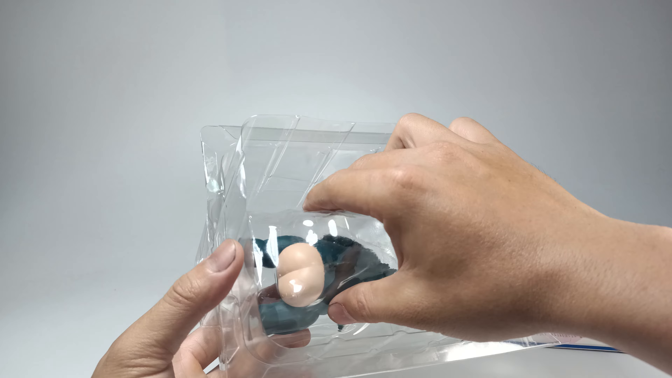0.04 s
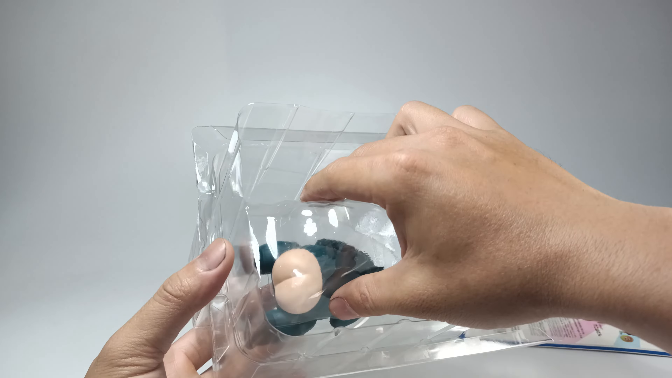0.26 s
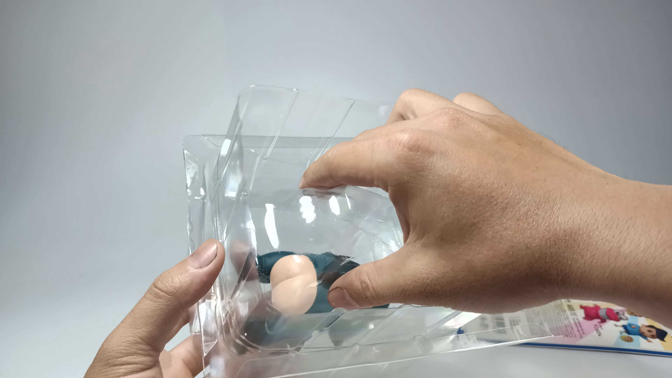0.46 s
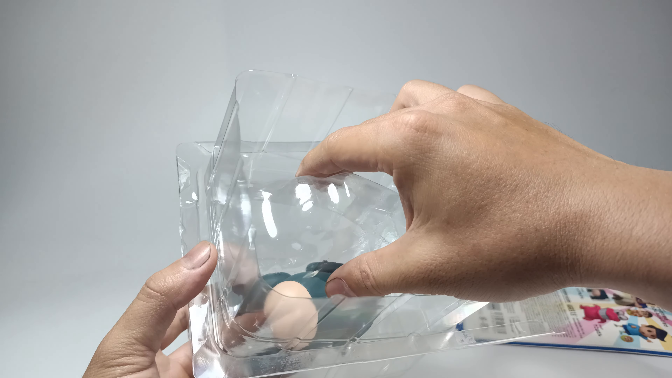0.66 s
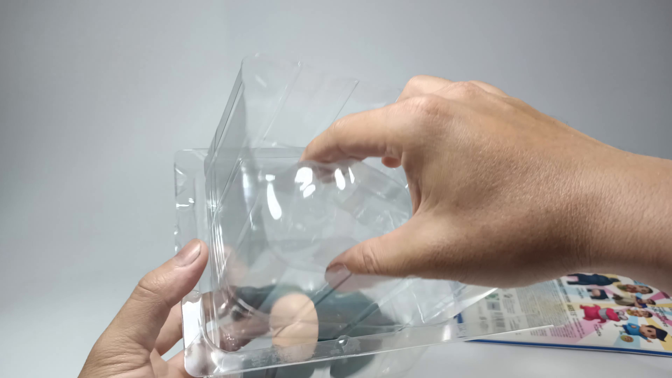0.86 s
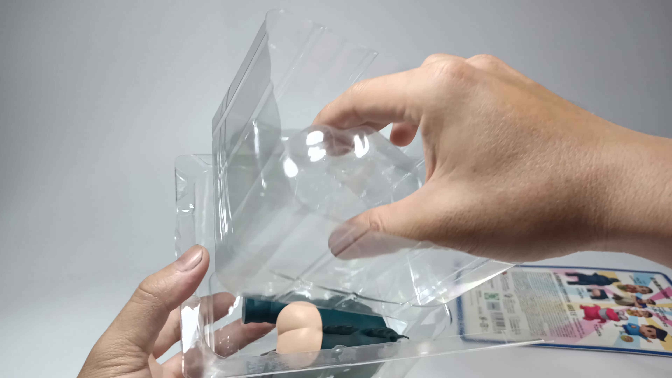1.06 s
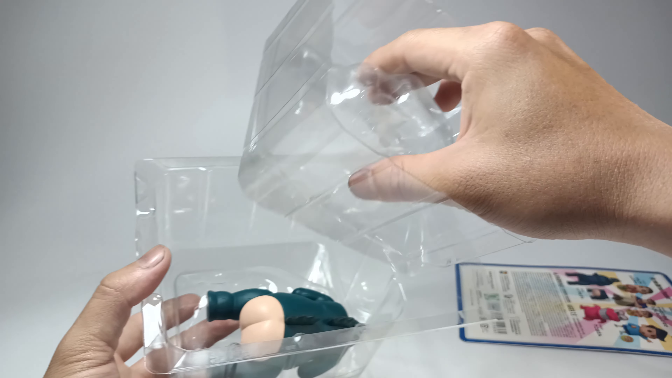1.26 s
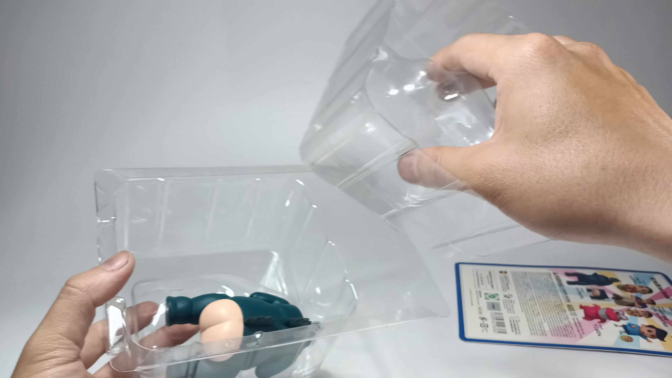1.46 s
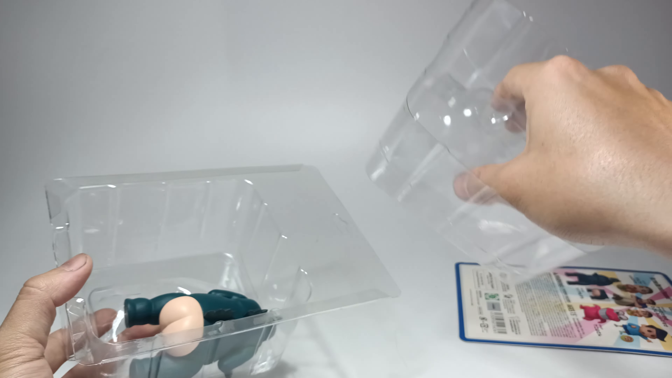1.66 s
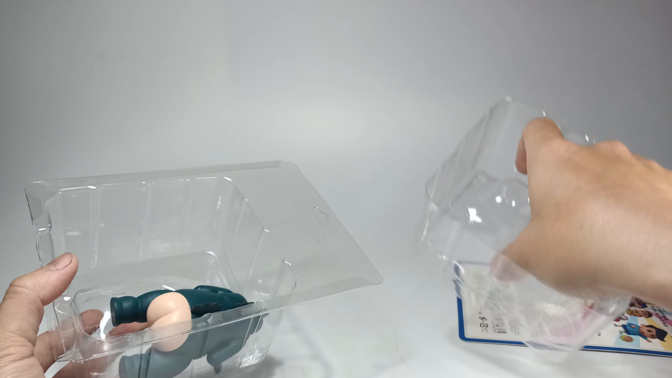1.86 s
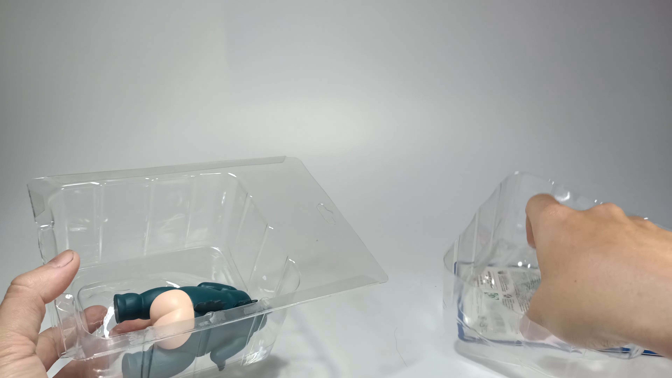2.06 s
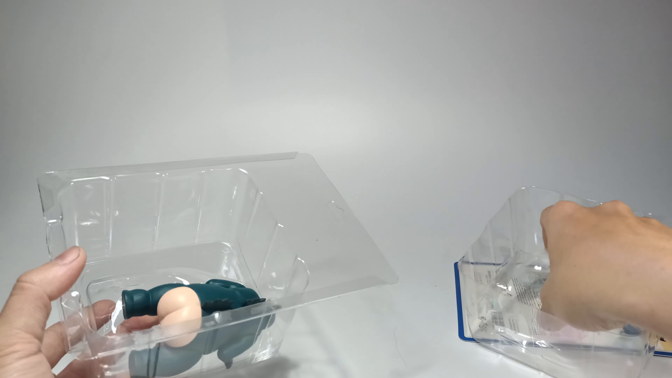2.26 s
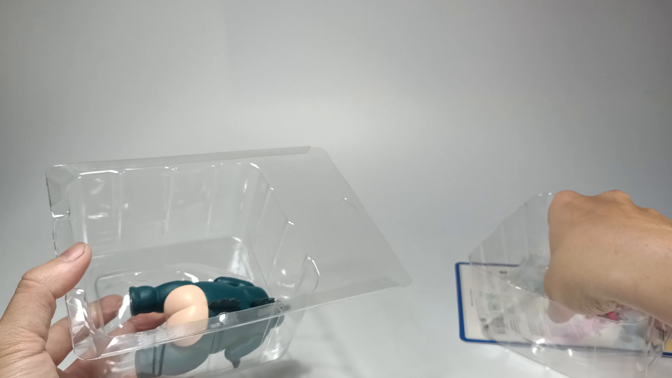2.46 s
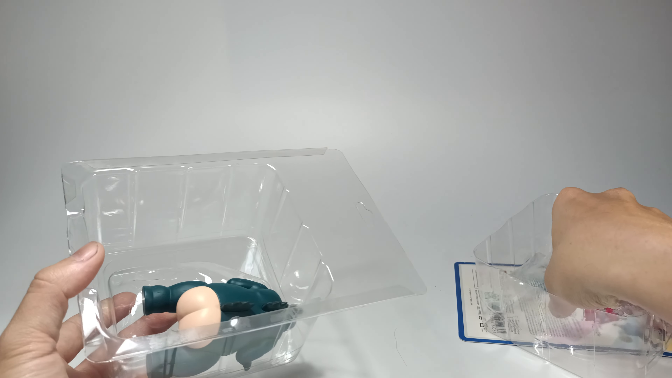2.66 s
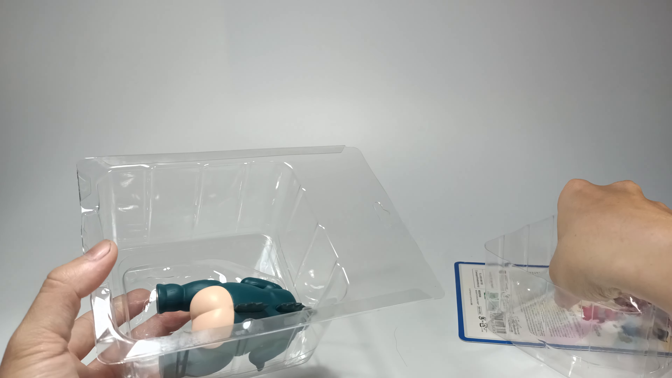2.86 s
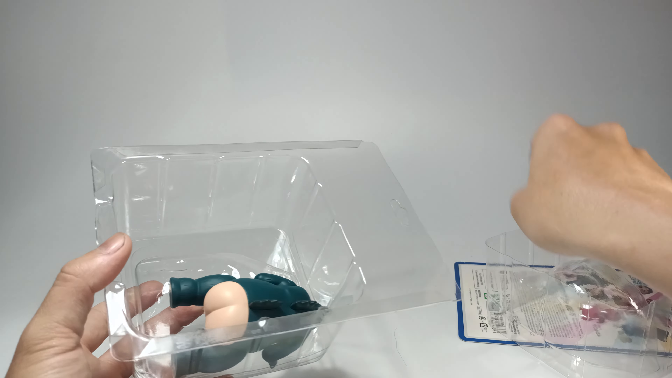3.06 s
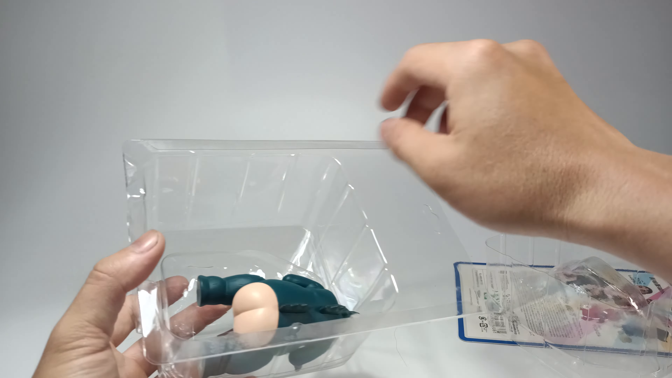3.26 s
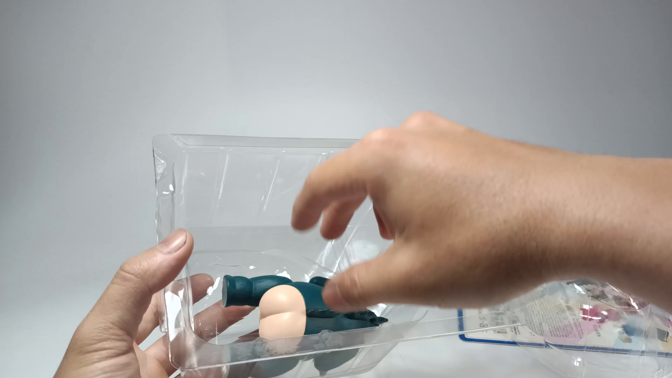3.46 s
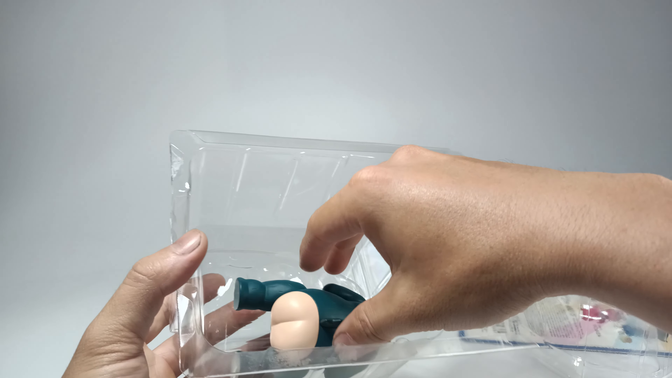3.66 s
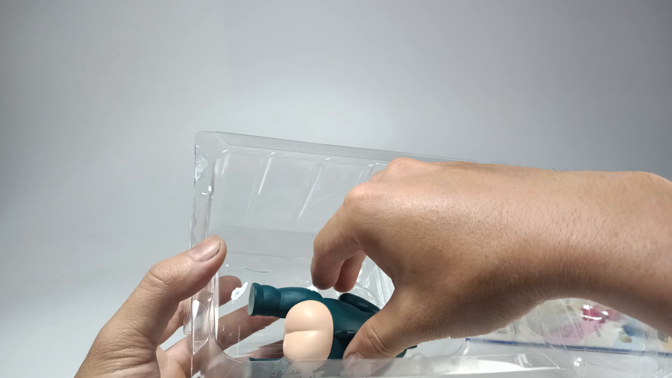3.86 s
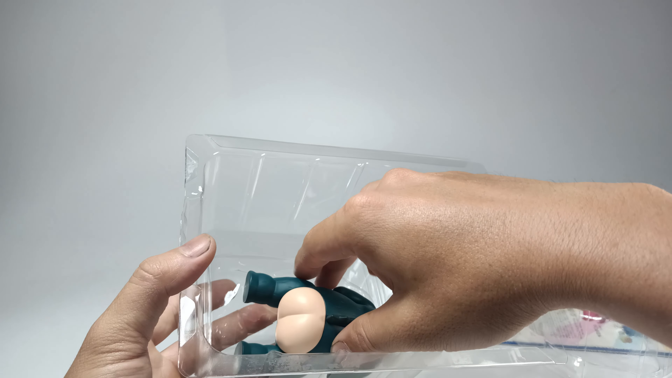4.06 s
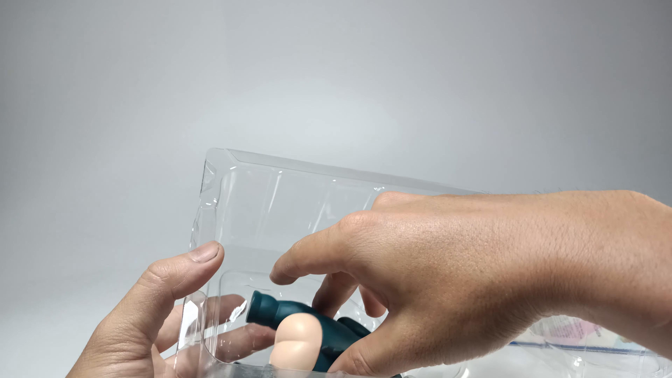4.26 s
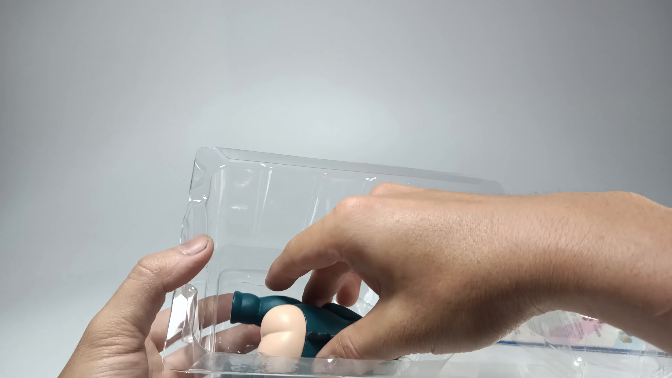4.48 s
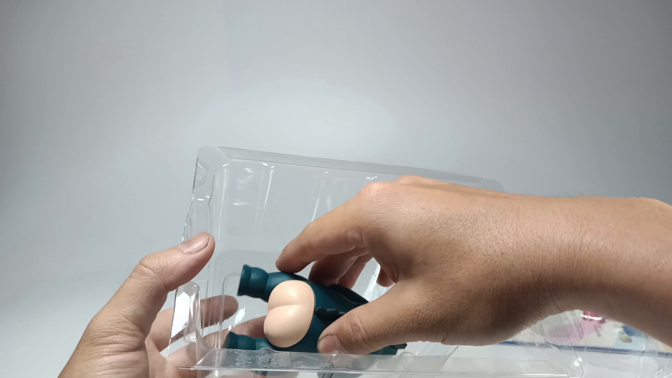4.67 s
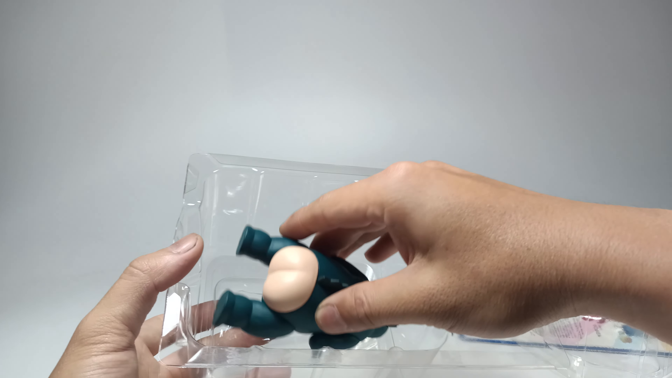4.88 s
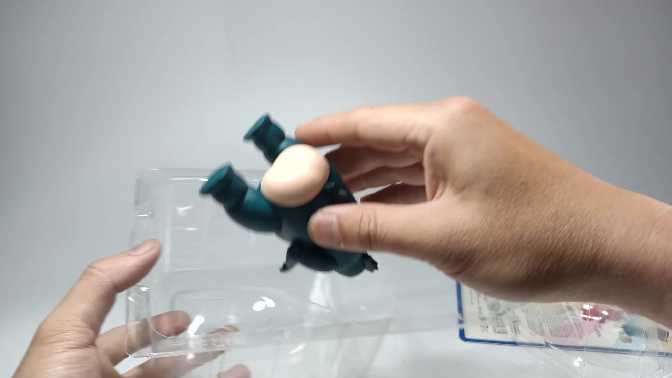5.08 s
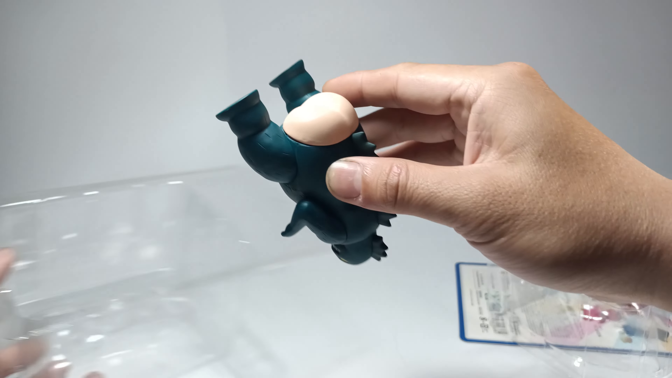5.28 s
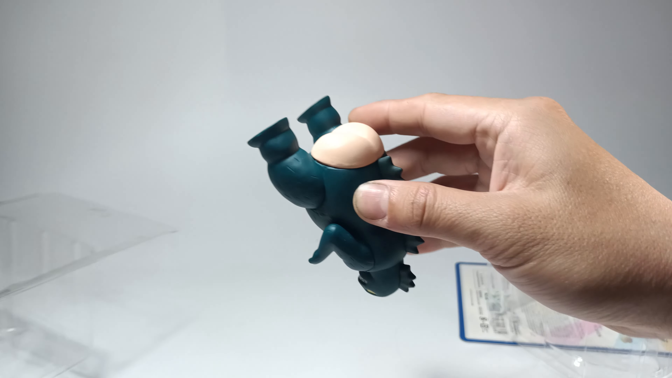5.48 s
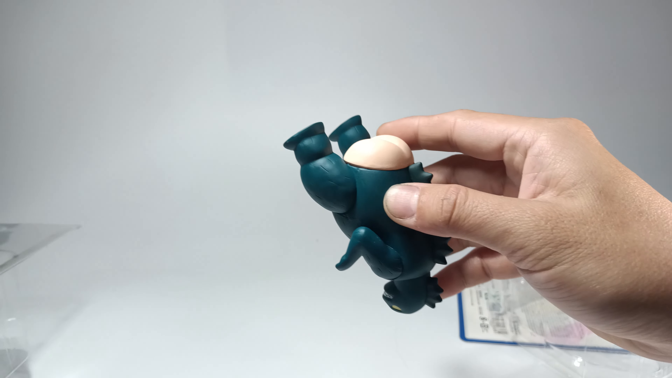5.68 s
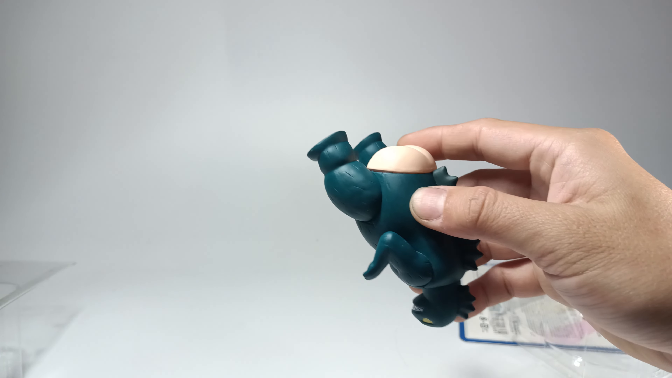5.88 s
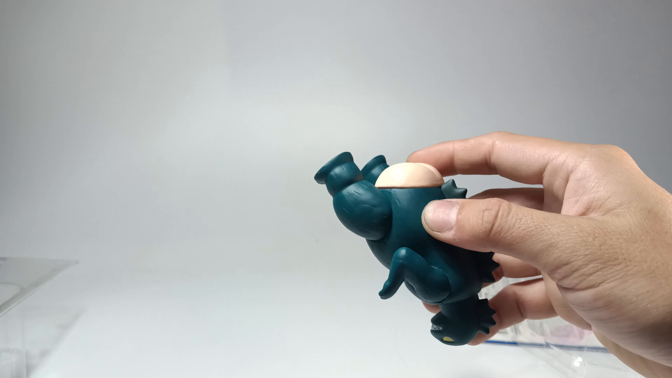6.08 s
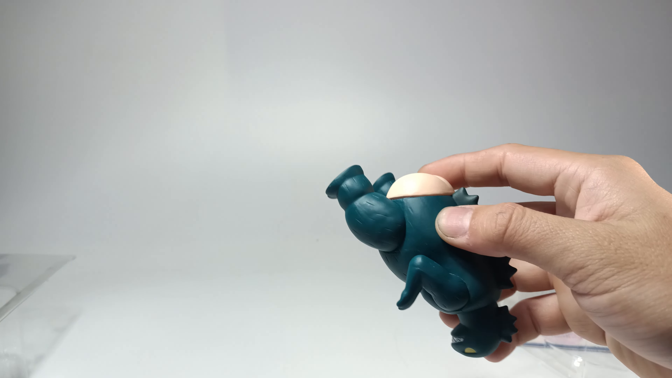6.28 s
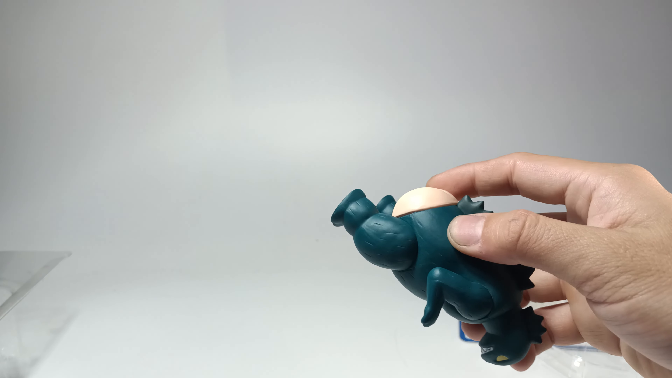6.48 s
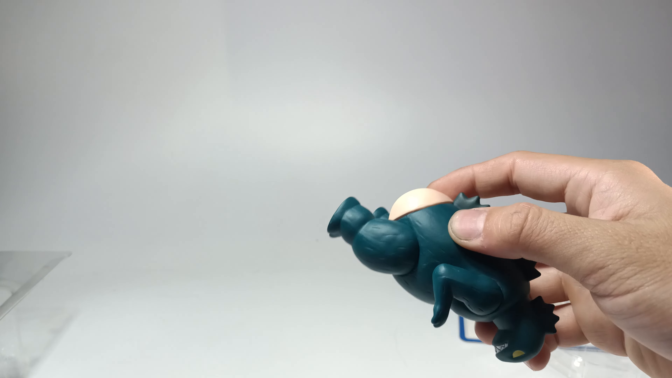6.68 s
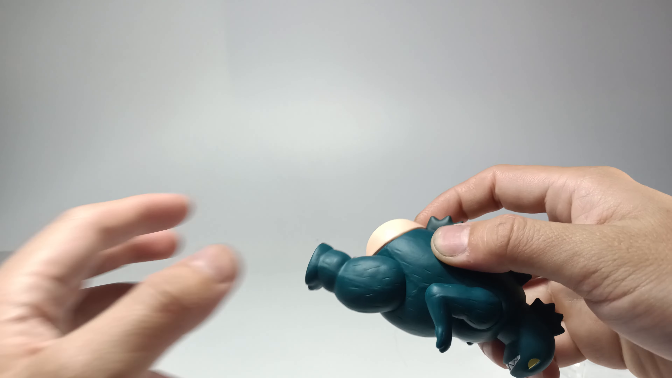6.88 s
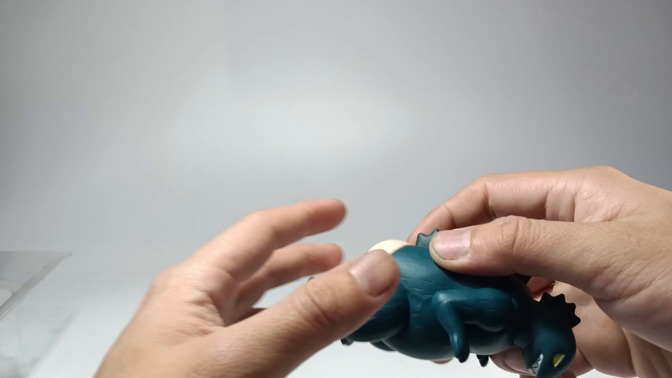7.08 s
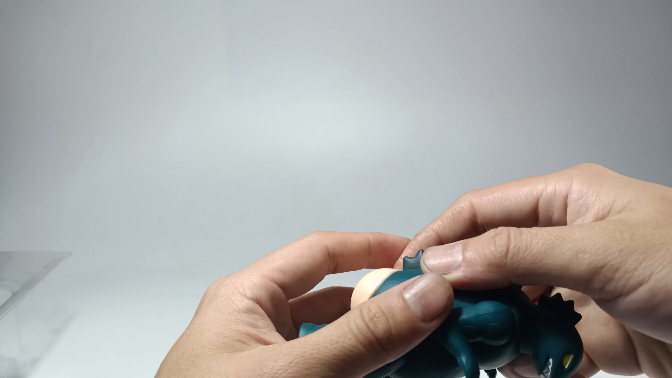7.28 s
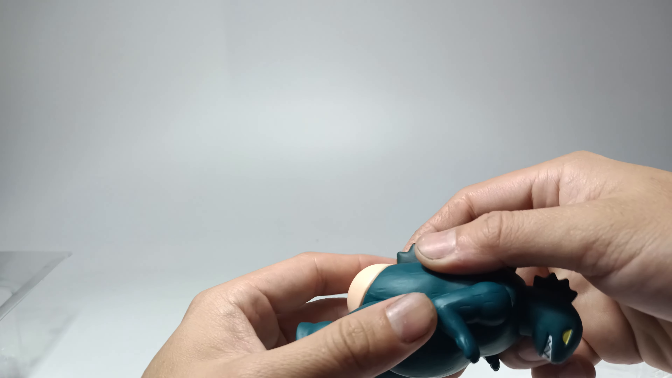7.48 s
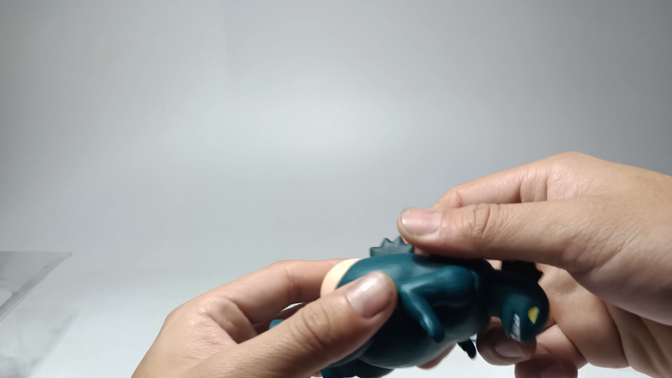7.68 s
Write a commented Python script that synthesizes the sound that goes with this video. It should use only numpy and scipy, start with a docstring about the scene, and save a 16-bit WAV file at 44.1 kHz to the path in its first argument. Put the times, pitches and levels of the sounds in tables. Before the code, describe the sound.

Hands open a thin clear plastic tray very close to the microphone. Sharp snaps build to two loud bursts of crackling with brief squeaks and hollow booms as the lid comes free. The lid lightly taps and drags on card, then fingers crinkle the tray, a crisp pop releases the toy, and the empty tray drops with a short clatter. Small quiet room with low rumble and faint hum.

```python
"""Opening a plastic blister tray

Hands pull the lid off a thin plastic tray, lay it on its card, prise a toy out and drop the tray aside.
Snaps, taps and landings are noise bursts and sums of decaying modes; squeaks are wavering tones.
Sliding is a dense train of random slips that hisses and stirs the walls; nails tick on the plastic.
A small room with rumble and a low mains hum is heard through two close microphone ports."""
import sys
import numpy as np
from scipy import signal
from scipy.fft import rfft, irfft, next_fast_len
from scipy.io import wavfile
from scipy.ndimage import uniform_filter1d, map_coordinates

SR = 44100
rng = np.random.default_rng(int(sys.argv[2]) if len(sys.argv) > 2 else 0)


def wav_record(signal):
    """Record a signal, one row per channel, as 16-bit PCM in the file named by sys.argv[1]."""
    frames = np.transpose(np.atleast_2d(signal))
    bounded = np.clip(frames, -1, 1)
    # unit amplitude maps onto the largest positive 16-bit level
    quanta = np.round(bounded * 32767).astype(np.int16)
    wavfile.write(sys.argv[1], SR, quanta)


N = 340893
TOP_HZ = 16200  # little is heard above this

# ringing modes of the lid's walls: f/Hz, level/dB, T60 as a multiple of the snap's own [1]
LID_WALL_MODES = [(804.6, 5.5, 1.7), (910, 6, 0.52), (1123, -2, 0.79), (1240, -5, 0.51), (1290, -0.5, 1.1),
                  (1413, -5, 2.4), (1568, 0, 1.9), (1700, -12.5, 1.4), (1892, -4.5, 1.2), (1970, -6.5, 1.5),
                  (2230, -4.5, 1.4), (2370, -6.5, 1.1), (3380, -2, 1.4)]
# spectrum of the lid's crowded, heavily damped modes: f/Hz, level per Hz/dB
LID_CLATTER_SPECTRUM = [(350, -10.5), (650, -5), (900, -1.5), (1600, -2.5), (2300, -7.5), (3200, -20),
                        (6000, -39)]
# spectrum of the bending panels: f/Hz, level per Hz/dB
PANEL_SPECTRUM = [(50, -26), (85, -22), (120, 3.5), (160, 3.5), (220, 1.5), (320, 2), (480, -2), (690, -13),
                  (1400, -40.5)]
# spectrum of a cracking crease: f/Hz, level per Hz/dB
CRACK_SPECTRUM = [(1500, -10), (2500, 6), (4500, 1), (7000, -1), (10000, -1.5), (12500, -4), (15500, -7.5)]
# strokes of plastic sliding over plastic, card and table:
# t/s, length/s, wall level/dB, hiss level/dB, run-out T60/s
SLIDING_STROKES = [(0.005, 0.072, -60.5, -67.5, 0.26), (0.184, 0.22, -68.5, -77.5, 0.44),
                   (0.293, 0.077, -57.5, -68.5, 1.3), (0.561, 0.12, -56, -84, 0.38),
                   (0.665, 0.044, -44.5, -56.5, 0.34), (0.97, 0.085, -51, -54, 0.31),
                   (1.08, 0.093, -71, -79, 1), (2.189, 0.22, -69.5, -87, 0.49),
                   (2.435, 0.11, -76, -88, 1.7), (2.954, 0.074, -68.5, -64.5, 0.12),
                   (3.815, 0.065, -71.5, -84, 0.84), (4.066, 0.09, -69.5, -83, 0.21),
                   (4.344, 0.12, -66, -72, 0.23), (4.48, 0.21, -68, -82, 3),
                   (5.147, 0.15, -69.5, -73, 0.37), (5.357, 0.24, -68, -77, 0.4),
                   (5.625, 0.058, -69.5, -70.5, 1.05), (5.886, 0.072, -55.5, -51.5, 0.37),
                   (6.103, 0.041, -70, -71, 0.37), (6.474, 0.074, -80, -75.5, 0.18),
                   (6.521, 0.11, -72, -70, 0.18)]
STROKE_ATTACK_S = 0.03


def undb(db):
    """Level to amplitude: 20 dB is a factor of ten."""
    return 10 ** (np.asarray(db) / 20)


def unit(x):
    """Normalisation to an rms of 1."""
    return x / np.sqrt(np.mean(x ** 2))


def curve(rows, column=1):
    """Linear interpolation in time of one column of a table."""
    rows = np.array(rows)
    return np.interp(np.arange(N) / SR, rows[:, 0], rows[:, column])


def colour(x, points):
    """Zero-phase filtering through (f/Hz, gain/dB) points joined on a log-frequency axis."""
    hz, db = np.transpose(points)
    size = next_fast_len(x.shape[-1], True)
    bins_hz = np.maximum(np.arange(size // 2 + 1) * SR / size, 1)
    gain = undb(np.interp(np.log(bins_hz), np.log(hz), db))
    return irfft(rfft(x, size) * gain, size)[..., :x.shape[-1]]


def noise(points, n, apart):
    """Partly coherent coloured noise at two ports; apart is the share of power that differs."""
    shared, *own = colour(rng.standard_normal((3, n)), points)
    apart = np.clip(apart, 0, 1)
    return unit(np.sqrt(1 - apart) * shared + np.sqrt(apart) * np.array(own))


def walk(rate):
    """Smoothed random steps, rate per second, with an rms near 1."""
    step = max(int(SR / rate), 1)
    held = np.repeat(rng.standard_normal(N // step + 1), step)
    return unit(uniform_filter1d(held, step)[:N])


def fade(t, t60):
    """Exponential free decay: the level falls 60 dB in t60 seconds."""
    return np.exp(-np.log(1000) * t / np.maximum(t60, 0.003))


def near(hz, centre_hz, octaves):
    """Selective excitation: the level falls off from a centre, by 6 dB at the given octaves."""
    return -6 * np.log2(1 + (np.log2(np.asarray(hz) / centre_hz) / octaves) ** 2)


def add(out, s, x):
    """Superposition: mix x in at time s."""
    i = max(int(s * SR), 0)
    out[:, i:i + x.shape[-1]] += x[..., :N - i]


def swell(s, length, db, attack_s, release_t60):
    """Envelope of one movement: a linear rise, a hold and an exponential decay."""
    t = np.arange(N) / SR - s
    rise = np.clip(t / attack_s, 0, 1)
    return undb(db) * rise * fade(np.clip(t - length, 0, 2), release_t60)


def ring(t, hz, db, t60, detune, scatter_db, skew):
    """Modal superposition: each blow finds the modes a little shifted, each port at its own phase."""
    shift, size, side = rng.standard_normal((3, len(hz), 1))
    gain = undb(db[:, None] + scatter_db * size) * rng.choice([-1, 1], (len(hz), 1))
    phase = 2 * np.pi * hz[:, None] * (1 + detune * shift) * t
    swing = gain / np.sqrt(np.sum(gain ** 2) / 2) * fade(t, t60[:, None])
    # long waves reach both ports alike
    lead = skew * side * np.clip(hz[:, None] / 1100, 0, 1)
    return np.array([np.sum(swing * np.sin(phase + port * lead), axis=0) for port in (1, -1)])


def background():
    """Ventilation noise, coherent between the ports in the bass, and steady hum tones that waver."""
    # rumble spectrum: f/Hz, level per Hz/dB
    air_spectrum = [(12, -46.5), (20, -15.5), (48, -3.5), (70, -10.5), (86, -12), (107, -0.5), (142, -13.5),
                    (172, -7.5), (328, -12), (388, -18.5), (434, -15), (642, -23.5), (1090, -26.5),
                    (2820, -44.5), (16000, -63.5)]
    # mains hum at 50 and 100 Hz and a steady tone at 316 Hz: f/Hz, level/dB
    hum_tones = [(50, -80), (100, -64.5), (316, -77.5)]
    air_db, wander_db, wander_per_s = -60, 1.17, 3
    mid, side = colour(rng.standard_normal((2, N)), air_spectrum)
    side = colour(side, [(25, -2.5), (70, -15.0), (300, -11.5), (700, 0.0), (1500, 0.0)])
    air = unit(mid + side * np.array([[1], [-1]])) * undb(air_db + 0.63 * walk(11.0))
    # the deep part wanders twice as far, in dB, as the rest
    deep = colour(air, [(130, 0.5), (260, -29)])
    deep_wander = undb(wander_db * walk(wander_per_s))
    rest_wander = undb(wander_db / 2 * walk(wander_per_s))
    out = deep * deep_wander + (air - deep) * rest_wander
    t = np.arange(N) / SR
    for hz, db in hum_tones:
        level = undb(db + 1.3 * walk(2.8))
        out = out + level * unit(np.sin(2 * np.pi * hz * t + 0.19 * walk(7)))
    return out


def stroke_gains():
    """Energy addition of overlapping strokes: gains of the hiss, the walls and the panels."""
    # the panels shake with the walls, but gain less from a harder stroke
    light_stroke_db, light_panel_db, panel_db_per_wall_db = -65.5, -60, 0.89
    power = 0
    for s, length, wall_db, hiss_db, run_out in SLIDING_STROKES:
        panel_db = light_panel_db + panel_db_per_wall_db * (wall_db - light_stroke_db)
        levels = [[hiss_db], [wall_db], [panel_db]]
        power = power + swell(s, length, levels, STROKE_ATTACK_S, run_out) ** 2
    return np.sqrt(power)


def crinkle(catches, count=8):
    """Impulse excitation: each catch rings one of several patches of wall, each slightly different."""
    t, patch = np.arange(SR // 10) / SR, rng.integers(0, count, N)
    hz, db, life = np.transpose(LID_WALL_MODES)
    total = 0
    for k in range(count):
        response = ring(t, hz, db + near(hz, 1100, 1.0), life * 0.02, 0.081, 2.5, 0.62)
        total = total + signal.oaconvolve([catches * (patch == k)], response, axes=1)[:, :N]
    return unit(total)


def rubbing():
    """Sliding friction: countless tiny slips hiss, stir the walls and shake the panels."""
    # spectrum of the slips' hiss: f/Hz, level per Hz/dB
    hiss_spectrum = [(1800, -9.5), (3000, 0), (4400, 1.5), (5400, 2.5), (6800, 1.5), (10000, 0.5),
                     (12000, -3.5), (16000, -11)]
    # about 900 slips and 70 larger catches a second
    slips = (rng.random(N) < 900 / SR) * undb(2.0 * np.minimum(rng.exponential(size=N), 3.5))
    grains = unit(slips * rng.standard_normal((2, N))) + 1.4 * rng.standard_normal((2, N))
    grains = grains * undb(1.2 * walk(60))
    # now and then a larger catch lets go with a tick and crinkles the wall
    catches = (rng.random(N) < 70 / SR) * rng.uniform(0.4, 1, N) ** 2
    hiss = unit(colour(unit(grains) + 0.24 * unit(catches), hiss_spectrum))
    patches = crinkle(unit(catches) + 0.66 * unit(grains[0]))
    # each port also hears half of the other's grains
    clatter = unit(colour(grains + 0.5 * grains[::-1], LID_CLATTER_SPECTRUM))
    walls = unit(patches + 0.53 * clatter)
    panels = noise(PANEL_SPECTRUM, N, 0.069) * undb(3.4 * walk(25))
    hiss_gain, wall_gain, panel_gain = stroke_gains()
    return hiss * hiss_gain + walls * wall_gain + panels * panel_gain


def bumps():
    """Structure-borne sound: forearms shifting on the table top send a deep rumble through it."""
    # shifts of the forearms: t/s, length/s, level/dB
    shifts = [(0.032, 0.46, -58.5), (2.295, 0.095, -55.5), (2.422, .04, -56), (2.517, 0.038, -54.5),
              (4.365, 0.59, -58.5), (5.37, 0.21, -58.5), (5.854, 0.1, -56)]
    spectrum = [(20, -1.5), (48, 16.0), (75, 9.5), (120, 18.0), (220, -38.0)]
    gain = sum(swell(*row, attack_s=0.036, release_t60=0.2) for row in shifts)
    return noise(spectrum, N, 0.054) * gain


def stray_snaps(count=6):
    """Friction shedding: small snaps at uneven moments of each stroke follow its strength."""
    per_s, over_stroke_db, spread_db = 24, 6, 4.5
    flex_db, crack_db, t60 = -9, -12, 0.12
    middle_hz, spread_octaves = 1270, 0.51
    rows = []
    for s, length, wall_db, *_ in SLIDING_STROKES:
        moments = (np.arange(count) + rng.random(count)) / per_s
        for delay, (size, pitch) in zip(moments, rng.uniform(-1.5, 1, (count, 2))):
            if delay < length:
                db = wall_db + over_stroke_db + spread_db * size
                hz = middle_hz * 2 ** (spread_octaves * pitch)
                rows.append((s + STROKE_ATTACK_S + delay, db, flex_db, crack_db, hz, t60))
    return rows


def stutter(count=4):
    """Successive slips: a crease lets go in a quick, uneven run that tends to weaken."""
    # median gap, then level of the later slips re the first
    gap_s, slip_db, fall_db, spread_db = 0.003, -13, -5, 4.5
    gap, size = rng.uniform(-1, 1, (2, count))
    times = np.cumsum(gap_s * 2 ** gap)
    run = np.zeros(SR // 20)
    run[0] = 1
    for k, s in enumerate(times):
        strength = undb(slip_db + k * fall_db + spread_db * abs(size[k]))
        run[min(int(s * SR), len(run) - 1)] += np.sign(size[k]) * strength
    return run / np.sqrt(np.sum(run ** 2))


def snaps(rows, wall_modes, clatter_points, detune):
    """Buckling: a crease cracks, the walls ring, and the broad panels follow with a hollow thump."""
    # bending modes of the panels: f/Hz, level/dB, T60/s
    panel_modes = [(121.5, -2, 0.095), (203, -8, 0.093), (238.6, -9, 0.14), (319.6, 5, 0.14),
                   (333, -11.5, 0.14), (458, 4, 0.12), (569, 2, 0.1)]
    # a harder snap bends the panels in tighter, higher modes
    hard_snap_db, hard_flex_hz, flex_octaves_per_db = -25, 307.4, 1.24
    out, t = np.zeros((2, N)), np.arange(SR // 6) / SR
    wall_hz, wall_db, wall_life = np.transpose(wall_modes)
    panel_hz, panel_db, panel_t60 = np.transpose(panel_modes)
    # each snap swells in over about two milliseconds
    swell_in_s = 0.0022
    rise, after = np.minimum(t / swell_in_s, 1) ** 2, np.maximum(t - swell_in_s, 0)
    for s, db, flex_db, crack_db, ring_hz, t60 in rows:
        # harder cracks reach further into the treble
        hard_db = 0.35 * (db + crack_db + 35.0)
        crack_points = [(f, d + hard_db * f / TOP_HZ) for f, d in CRACK_SPECTRUM]
        crack_decay = fade(after, 0.0092) + undb(-9.5) * fade(after, t60)
        crack = noise(crack_points, len(t), 0.94) * crack_decay
        excited_db = wall_db + near(wall_hz, ring_hz, 0.65)
        modes = ring(t, wall_hz, excited_db, wall_life * t60, detune, 4.9, 0.13)
        # between the clear modes lie many heavily damped ones
        dense_points = [(f, d + near(f, ring_hz, 0.94)) for f, d in clatter_points]
        clatter = noise(dense_points, len(t), 0.37) * fade(after, t60)
        walls = undb(-8.0) * modes + undb(-7.0) * clatter
        flex_hz = hard_flex_hz * 2 ** (flex_octaves_per_db * (db - hard_snap_db))
        bent_db = panel_db + near(panel_hz, flex_hz, 0.85)
        flex = ring(t, panel_hz, bent_db, panel_t60, 0.027, 2.1, 0.083)
        panel_noise = noise(PANEL_SPECTRUM, len(t), 0.06) * fade(t, 0.075)
        thump = (undb(-6.0) * flex + undb(-7.0) * panel_noise) * (1 - fade(t, 0.019))
        burst = rise * (walls + undb(crack_db) * crack)
        crackle = signal.fftconvolve(burst, stutter()[None], axes=1)[:, :len(t)]
        add(out, s - swell_in_s / 2, undb(db) * (crackle + undb(flex_db) * rise * thump))
    return out


def lid_and_stray_snaps():
    """Buckling of the lid, and small stray snaps in every sliding stroke."""
    # t/s, ring level/dB, panel flex re ring/dB, crack re ring/dB, ring centre f/Hz, gripped T60/s
    lid_rows = [ (0.047, -27.5, -17, -31, 1200, 0.028), (0.067, -43, -16, -7.5, 1530, 0.059),
                (0.14, -30, -12, -22, 1380, 0.03), (0.324, -33, -9.5, -23, 1390, 0.049),
                (0.348, -45, -4, -7, 950, 0.06), (0.368, -42.5, -7, -15, 1930, 0.031),
                (0.376, -30, -25, -17.5, 1370, 0.06), (0.388, -38, -10, -19, 1490, 0.063),
                (0.411, -45, -4, -10, 1600, 0.065), (0.467, -49, -9, -6, 1900, 0.071),
                (0.558, -36.5, -6, -16, 970, 0.021), (0.564, -28, -8.5, -14.5, 1440, 0.029),
                (0.57, -34, -15, -10.5, 1520, 0.042), (0.620, -39, -6, -25, 1590, 0.022),
                (0.686, -34.5, -3, -19, 1300, 0.055), (0.694, -26.5, -10.5, -16, 1200, 0.06),
                (0.706, -17, -17, -13, 1220, 0.036), (0.721, -26, -9, -18.5, 1200, 0.061),
                (0.733, -27, -4, -15.5, 1410, .04), (0.739, -26, -9, -10, 1510, 0.048),
                (0.748, -34.5, -3, -7.5, 950, 0.052), (0.9205, -28, -13, -24, 1030, 0.047),
                (0.9245, -24.5, -10, -20, 1150, 0.034), (0.933, -25, -13, -16, 1440, 0.057),
                (0.944, -36.5, 2, -19, 1200, 0.084), (0.958, -36.5, -1, -8, 1000, 0.07),
                (0.98, -22.5, -16, -11, 967, 0.032), (0.986, -25, -8.5, -4, 1070, 0.025),
                (0.994, -28.5, -7.5, -18, 1100, .035), (1.0, -21.5, -8, -16, 1500, 0.029),
                (1.006, -25.5, -21, -8.5, 1400, 0.016), (1.01, -19, -2.5, -11, 1370, 0.033),
                (1.021, -32, -4, -19, 900, .04), (1.031, -27, -8, -10.5, 1900, 0.041),
                (1.039, -35.5, -4, -1, 1500, 0.04), (1.045, -26.5, -4.5, -16.5, 940, 0.067),
                (1.056, -29, -6, -12, 1090, 0.062), (1.068, -37, -7, -7.5, 1200, .05),
                (1.076, -40.5, 2, -4.5, 1440, .06), (1.102, -44, 2, -2, 1440, .06),
                (1.127, -51.5, -8.5, 0, 1900, .05), (1.151, -57, -13, -3.5, 1500, .04),
                (1.175, -57.5, -9, -2, 1500, 0.041), (2.1565, -57, -6, 11, 2660, 0.011),
                (2.297, -57, 6, -18, 1560, 0.06), (2.361, -66, -8, 1, 1900, 0.045),
                (2.441, -56, -1, -15, 990, 0.084), (2.508, -57, -8, -12, 1550, .06),
                (2.54, -55, -4.5, -25, 860, 0.085), (2.653, -62.5, -6, -8, 1494, 0.066),
                (2.818, -59, -5, -5.5, 1896, 0.091), (2.965, -56, 2.5, -18.5, 1540, 0.071),
                (2.992, -65, -8, 0, 1820, .03), (3.006, -60, -10, -1, 2000, .025),
                (3.021, -59, -12, -2, 1900, .025), (3.038, -58.5, 8, 4, 1850, 0.058)]
    # bending shifts the modes from snap to snap by a share of their pitch
    return snaps(lid_rows + stray_snaps(), LID_WALL_MODES, LID_CLATTER_SPECTRUM, detune=0.045)


def ticks():
    """Local impact: a fingernail touches the plastic and rings one small patch of it."""
    # t/s, level/dB, centre f/Hz
    touches = [(0.466, -60, 5200), (1.151, -56, 6200), (1.496, -71.5, 4470), (1.683, -75.5, 4000),
               (1.731, -76.5, 4200), (2.652, -56.5, 1220), (2.818, -58, 1230), (2.981, -62, 3450),
               (3.011, -64, 2900), (3.033, -57.5, 1850), (3.048, -62.5, 3330), (4.372, -53, 1550),
               (4.431, -52, 3200), (4.486, -44.5, 3100), (4.518, -53, 1493), (4.557, -53, 1750),
               (4.585, -50, 1460), (4.611, -48, 1050), (5.43, -64.5, 1512), (5.53, -67, 9500),
               (5.561, -53, 1445), (5.616, -65, 1408), (6.592, -64, 897), (7.171, -62, 798),
               (7.471, -65, 798)]
    out, t = np.zeros((2, N)), np.arange(SR // 10) / SR
    hz = np.geomspace(100, TOP_HZ, 80)
    for s, db, centre_hz in touches:
        band = np.transpose([hz, near(hz, centre_hz, octaves=0.24)])
        add(out, s, undb(db) * noise(band, len(t), 0.57) * fade(t, t60=0.036))
    return out


def squeaks():
    """Stick-slip of plastic binding on plastic: a brief wavering tone with a weak octave."""
    # t/s, length/s, first f/Hz, last f/Hz, level/dB
    bindings = [(0.664, 0.048, 799, 778, -42.5), (0.706, 0.016, 893, 864, -37),
                (0.977, 0.029, 925, 787, -36)]
    out = np.zeros((2, N))
    for s, length, first_hz, last_hz, db in bindings:
        n = int(length * SR)
        hz = np.linspace(first_hz, last_hz, n) * (1 + 0.044 * walk(377)[:n])
        phase = 2 * np.pi * np.cumsum(hz) / SR
        tone = np.sin(phase) + undb(-14) * np.sin(2 * phase)
        add(out, s, undb(db) * unit(tone) * signal.windows.tukey(n, 0.5))
    return out


def free_rings():
    """Beating of close modes: lid booms, lid-edge taps and rim taps fade as narrow bands."""
    # the lid springs free and booms: t/s, f/Hz, level/dB, T60/s
    booms = [(.688, 233, -39.5, 0.065), (.72, 128, -44, 0.075), (.725, 218, -38, 0.24),
             (0.926, 210, -39, 0.19), (0.998, 249, -34, 0.13), (1.009, 312.4, -26, 0.09),
             (1.049, 315, -27, 0.066), (1.062, 124, -37.5, 0.26)]
    # the lid's edge taps the card: t/s, level/dB
    lid_taps = [(2.156, -49)]
    # ringing of the lid's edge: f/Hz, level/dB, T60/s
    lid_edge_modes = [(2560, -3, 0.038), (2750, 1.5, 0.025), (3380, 1, 0.021), (4600, 0.5, 0.017),
                      (5940, -9.5, 0.021)]
    # the tray's stiff rim taps the table: t/s, level/dB
    rim_taps = [(5.8785, -40), (6.2275, -53.5)]
    # ringing of the rim: f/Hz, level/dB, T60/s
    rim_modes = [(1723, 6, 0.019), (2100, -12, 0.029), (3270, -20.5, .025)]
    out, t = np.zeros((2, N)), np.arange(SR // 2) / SR
    struck = list(booms)
    for hits, modes in [(rim_taps, rim_modes), (lid_taps, lid_edge_modes)]:
        struck += [(s, hz, db + mode_db, t60) for s, db in hits for hz, mode_db, t60 in modes]
    for s, hz, db, t60 in struck:
        cluster = hz * np.linspace(0.98, 1.02, 3)
        tone = ring(t, cluster, np.zeros(3), np.full(3, t60), 0.0093, 1.7, 0.5)
        add(out, s, undb(db) * tone * (1 - fade(t, 0.0061)))
    return out


def lid_drags():
    """Friction-driven resonance: as the lid drags over the card, panels drone and the edge sings."""
    # t/s, length/s, panel level/dB, edge level/dB
    drags = [(2.157, .04, -69, -68), (2.196, 0.069, -62, -79), (2.283, 0.054, -55.5, -67.5),
             (2.424, 0.031, -70, -78), (2.555, .08, -71.5, -75.5), (2.938, 0.045, -66, -68.5),
             (3.018, 0.054, -65.5, -75), (3.12, 0.11, -67.5, -86)]
    # bands in which the panels drone: f/Hz, level/dB
    panel_bands = [(190, -4.5), (255, 2.5), (322, 5.5), (470, 0), (620, -9), (800, -17)]
    # bands in which the edge sings: f/Hz, level/dB
    edge_bands = [(1290, -4.5), (1565, -0.5), (2240, -9), (3050, -12), (4400, -18), (6600, -18.5)]

    def sing(bands, apart):
        """Resonance bands: noise peaks falling 30 dB within 0.13 octave on either side."""
        peaks = [(f * 2 ** (k * 0.13), d - 30 * abs(k)) for f, d in bands for k in (-1, 0, 1)]
        return noise(peaks, N, apart)

    gains = 0
    for s, length, panel_db, edge_db in drags:
        gains = gains + swell(s, length, [[panel_db], [edge_db]], STROKE_ATTACK_S, release_t60=0.21)
    panel, edge = gains
    judder = undb(1 * walk(70))
    return (panel * sing(panel_bands, 0.071) + edge * sing(edge_bands, 0.7)) * judder


def tray_snaps():
    """Buckling of the tray as fingers prise the toy out, and as it is swung aside and settles."""
    # t/s, ring level/dB, panel flex re ring/dB, crack re ring/dB, ring centre f/Hz, T60/s
    rows = [ (3.641, -53, -18, -1, 2290, 0.079), (3.667, -57.5, -13, 0.5, 1075, 0.11),
            (3.772, -56, -1, -8, 1050, 0.055), (3.82, -51.5, -0.5, -8, 1050, 0.16),
            (3.836, -46.5, -23, 0.5, 2080, 0.056), (3.846, -42, -6.5, -15, 1010, 0.036),
            (3.946, -61, -4, -6, 1490, .04), (4.039, -41, -17, -9, 1166, 0.031),
            (4.094, -51.5, -7, -10, 1290, 0.056), (4.107, -64, -10, -1, 1900, .04),
            (4.145, -49, -6, -16, 1680, 0.047), (4.265, -52.5, -0.5, -10.5, 2230, 0.084),
            (4.341, -42, -11, -10.5, 990, 0.076), (4.349, -37.5, -19, -10, 1470, 0.034),
            (4.365, -43.5, -16, -9, 1580, 0.065), (4.375, -44.5, -5.5, -11, 1480, 0.068),
            (4.413, -42, -23, -7, 1830, 0.045), (4.419, -40, -18, -3, 1410, 0.077),
            (4.451, -57, -3, -3, 1497, .05), (4.461, -49.5, -8, -6, 1000, .05),
            (4.484, -40, -32, -5.5, 1650, 0.044), (4.515, -55, -23, -26, 1500, 0.098),
            (4.555, -47.5, -18, -6, 1557, 0.05), (4.582, -44, -15, -31, 1480, 0.038),
            (4.608, -40.5, -17, -15.5, 1050, 0.042), (4.636, -52, -12, -11, 1395, 0.058),
            (4.772, -24, -26, -14, 1770, 0.028), (4.777, -29.5, -8.5, -31, 1020, 0.08),
            (4.912, -54.5, 1, -6.5, 1400, 0.037), (4.928, -54, -5, -15, 1510, 0.032),
            (5.039, -53, -9, -11, 1130, 0.043), (5.184, -50, -12, -11.5, 1460, 0.065),
            (5.358, -52.5, -2, -8, 1374, 0.11), (5.879, -35.5, -17, -5.5, 1900, 0.028),
            (6.228, -56, -17.5, -2.5, 1740, 0.026), (6.457, -60, -27.5, -3.5, 963, 0.12)]
    # ringing modes of the tray's walls: f/Hz, level/dB, T60 as a multiple of the snap's own [1]
    wall_modes = [(787, 7.5, 0.85), (950, 9.5, 0.91), (1025, 6, 1.7), (1455, -4, 1.95), (1580, 3.5, 1.94),
                  (1763, -4, 1.3), (1894, -15.5, 0.99), (2120, -7, 0.81), (2370, -3, 1.1),
                  (2660, -15, 0.74), (3320, 1.5, 1.13), (3840, -9.5, 0.89), (4090, 7, 0.62)]
    # crowded, heavily damped modes: f/Hz, level per Hz/dB
    clatter_points = [(350, -26), (680, -6), (950, 5), (1200, -9.5), (1500, -3.5), (2300, -2.5),
                      (3200, -14), (6000, -39)]
    return snaps(rows, wall_modes, clatter_points, detune=0.033)


def scrape():
    """Sliding friction: the tray's edge drags unevenly along the table in a few narrow bands."""
    # scraping bands: f/Hz, level per Hz/dB
    spectrum = [(1800, -15), (3600, -10), (4300, -3), (4750, -14), (5350, -3), (6000, -22), (6700, -10),
                (8500, -31)]
    # t/s, length/s, level/dB, attack/s
    pulls = [(5.116, 0.18, -69.5, 0.047), (5.635, 0.024, -76, .012)]
    gain = sum(swell(s, length, db, attack_s, release_t60=0.39) for s, length, db, attack_s in pulls)
    judder = undb(1 * walk(35))
    return noise(spectrum, N, 0.77) * gain * judder


def landings():
    """Impact on a free shell: each contact of the falling tray cracks, clatters and rings on."""
    # ringing of the tray, which no hand damps: f/Hz, level/dB, T60/s
    free_modes = [(114, -2, 0.39), (173, -1.5, 0.16), (252, -5, 0.11), (350.4, 3, 0.096), (539, -1.5, .1),
                  (979, -6.5, .17), (1077, -5.5, 0.31), (1157, -7, 0.31), (1260, -7.5, 0.21),
                  (1474, -9.5, 0.3), (1780, -8, 0.25), (1944, -10, 0.27), (2260, -11, 0.18),
                  (2870, -19, 0.19), (3570, -10.5, 0.29)]
    # it lands, bounces and chatters to rest: t/s, level/dB, crack re blow/dB, centre f/Hz
    blows = [(5.891, -28, -6, 770), (5.902, -33, -5, 483), (5.912, -31.5, -15, 427), (5.925, -31, -5, 760),
             (5.931, -36.5, -9, 950), (5.944, -44, -10, 1200), (5.957, -41.5, -7, 1100),
             (5.968, -37.5, -3, 1000), (5.981, -44, -5, 800), (6.006, -48, -9, 1100), (6.042, -54, 0, 1090),
             (6.067, -53.5, -2, 1200)]
    # its crowded, quickly damped modes: f/Hz, level per Hz/dB
    dense_spectrum = [(80, -12), (130, 4), (200, -1), (350, 0), (540, -3), (670, -12), (830, -6),
                      (1080, -1.5), (1400, -8), (1800, -3), (2500, -12), (3200, -8), (4200, -19),
                      (8000, -32)]
    out, t = np.zeros((2, N)), np.arange(SR // 2) / SR
    hz, mode_db, t60 = np.transpose(free_modes)
    for s, db, crack_db, centre_hz in blows:
        points = [(f, d + near(f, centre_hz, octaves=1.5)) for f, d in dense_spectrum]
        clatter = noise(points, len(t), 0.17) * fade(t, 0.063)
        modes = ring(t, hz, mode_db + near(hz, centre_hz, 2.5), t60, 0.022, 1.8, 0.52)
        crack_decay = fade(t, 0.013) + undb(-11) * fade(t, 0.067)
        crack = noise(CRACK_SPECTRUM, len(t), 1.0) * crack_decay
        blow = clatter + undb(-6) * modes + undb(crack_db) * crack
        add(out, s, undb(db) * blow * (1 - fade(t, 0.0045)))
    return out


def causal(hz, gain, size=4096):
    """Minimum phase by the folded cepstrum: these gains with nothing ahead of the blow."""
    cepstrum = irfft(np.interp(np.arange(size // 2 + 1) * SR / size, hz, np.log(gain)))
    k = np.arange(size)
    fold = (np.sign(k) + 1) * (k < size // 2)
    return irfft(np.exp(rfft(cepstrum * fold)))


def fine_resonances(x, spacing_hz, depth_db):
    """Modal density: a thin shell's crowded treble modes differ between ports and ring on."""
    hz = np.arange(1500, SR / 2, max(spacing_hz, 30))
    shared, *own = np.clip(rng.standard_normal((3, len(hz))), -1.5, 1.5)
    # the ripple grows from nothing at the lowest frequency to full depth an octave above
    onset = np.clip((hz - hz[0]) / hz[0], 0, 1)
    ripple = undb(depth_db * (shared + np.array(own)) / np.sqrt(2) * onset)
    ripple = ripple / np.sqrt(uniform_filter1d(ripple ** 2, size=12, axis=1))
    return np.array([signal.oaconvolve(port, causal(hz, r))[:N] for port, r in zip(x, ripple)])


def room(x, t60, treble_t60, wet_db):
    """Reverberation: near walls answer within milliseconds, with separate decays for low and high."""
    low_points = [(60, -20.5), (200, -6.5), (500, 2.0), (1200, -3.5), (4000, -77.0)]
    high_points = [(300, -19.0), (900, -1.5), (2500, 1.0), (7000, 2.5), (16000, -10.5)]
    t = np.arange(SR // 2) / SR
    low = noise(low_points, len(t), 0.24) * fade(t, t60)
    high = noise(high_points, len(t), 1.0) * fade(t, treble_t60)
    response = (undb(-10.5) * low + high) * np.clip((t - 0.003) / 0.0031, 0, 1)
    response = response / np.sqrt(np.sum(response ** 2) / 2)
    return x + undb(wet_db) * signal.fftconvolve(x, response, axes=1)[:, :N]


def scene():
    """Arrival-time difference: the plastic mostly reaches the left port first, within the room."""
    # where the plastic is: t/s, lead of the left port/ms
    place = [(0, 0.11), (1.1, 0.14), (2.1, -0.21), (3.1, -0.1), (3.6, 0.059), (4.8, 0.13), (5.9, 0.28)]
    plastic = lid_and_stray_snaps() + tray_snaps() + landings() + rubbing()
    shell = fine_resonances(plastic, spacing_hz=105.9, depth_db=2.9)
    left, right = shell + ticks() + squeaks() + scrape() + lid_drags() + free_rings()
    # reading the right port at earlier moments delays it
    read_at = np.arange(N) - curve(place) * SR / 1000
    right = map_coordinates(right, [read_at], order=5)
    wet = room(np.array([left, right]), t60=0.19, treble_t60=0.21, wet_db=-12.5)
    return wet + bumps() + background()


def record(dry):
    """Treble colour: left and right have different peaks and dips, with little above 16 kHz."""
    # treble colour: f/Hz, left level/dB, right level/dB
    treble_colour = [(2110, 1, 1), (2996, -2.5, -3), (5010, -4.5, 2.5), (7020, -14.5, 5), (7600, -7.5, -2),
                     (9820, 8, -18.5), (11300, -2.5, -18.5), (12800, -2.5, -3), (15000, -12.5, -1)]
    left = colour(dry[0], [(hz, db) for hz, db, _ in treble_colour])
    right = colour(dry[1], [(hz, db) for hz, _, db in treble_colour])
    low_pass = signal.ellip(8, 0.2, 70, TOP_HZ, fs=SR, output="sos")
    return signal.sosfilt(low_pass, np.array([left, right]))


dry = scene()
out = record(dry)
wav_record(out)
```